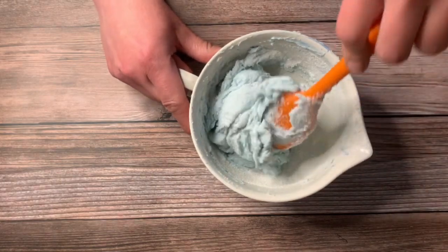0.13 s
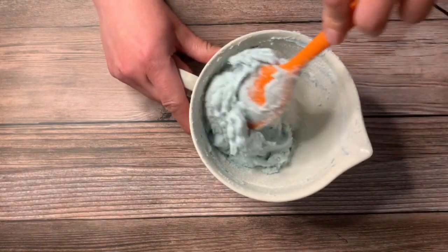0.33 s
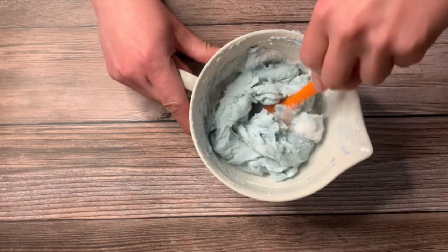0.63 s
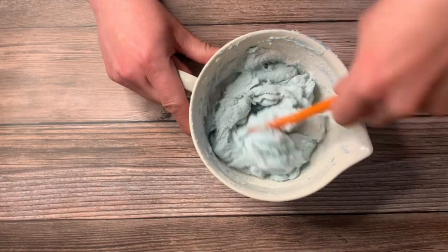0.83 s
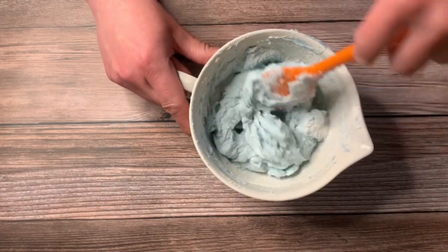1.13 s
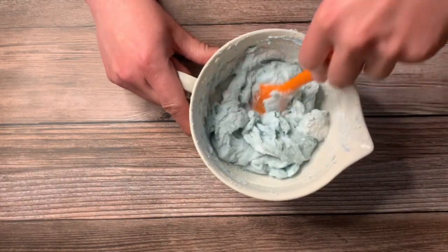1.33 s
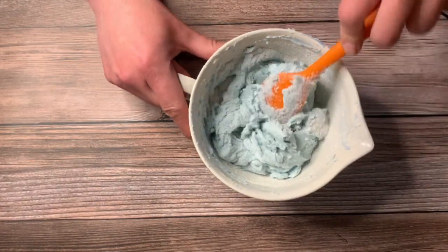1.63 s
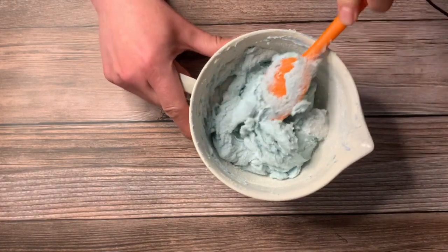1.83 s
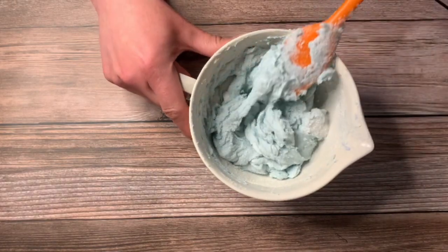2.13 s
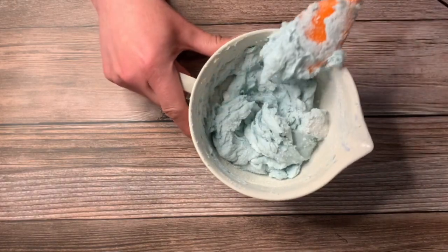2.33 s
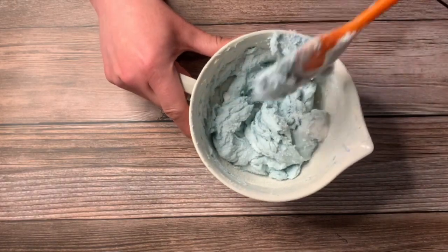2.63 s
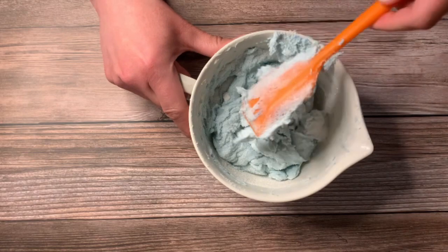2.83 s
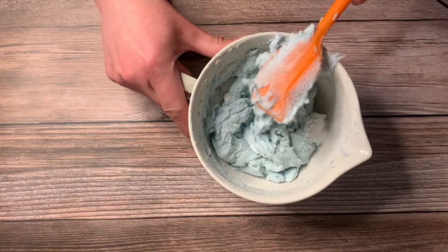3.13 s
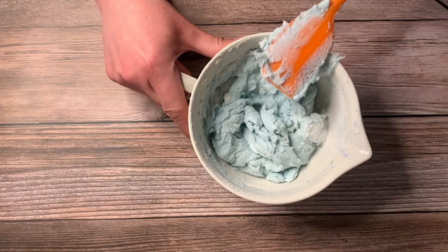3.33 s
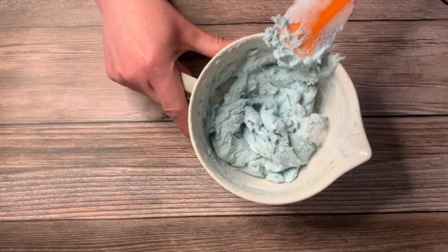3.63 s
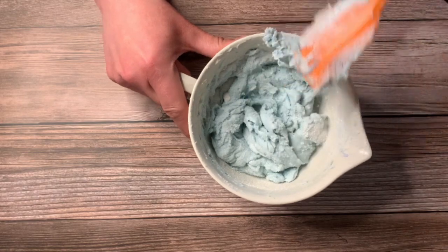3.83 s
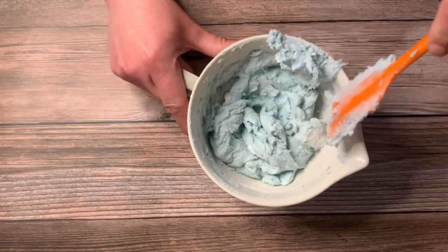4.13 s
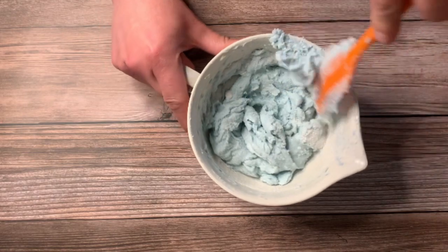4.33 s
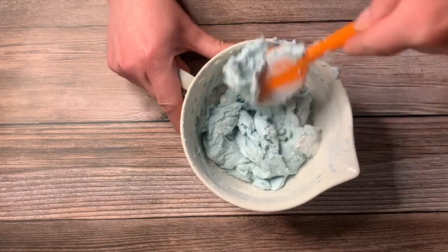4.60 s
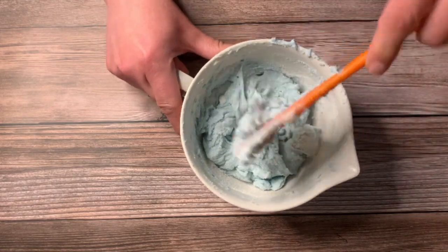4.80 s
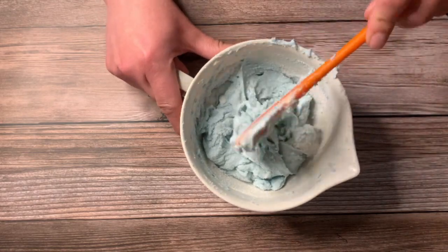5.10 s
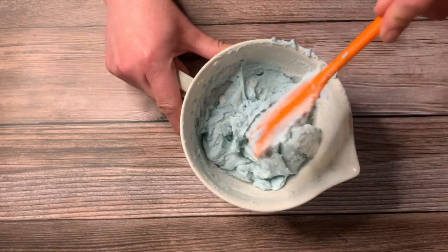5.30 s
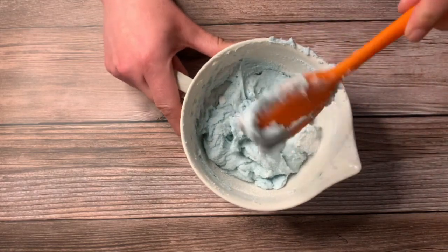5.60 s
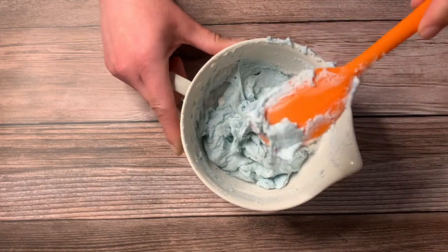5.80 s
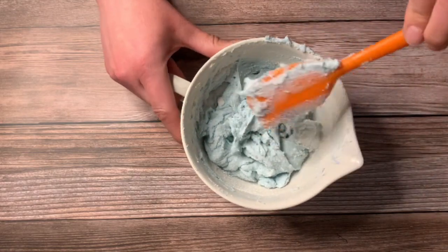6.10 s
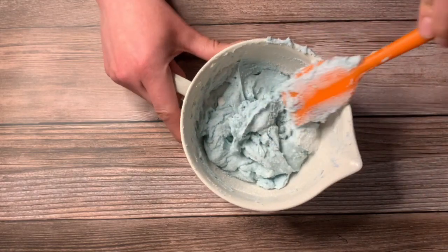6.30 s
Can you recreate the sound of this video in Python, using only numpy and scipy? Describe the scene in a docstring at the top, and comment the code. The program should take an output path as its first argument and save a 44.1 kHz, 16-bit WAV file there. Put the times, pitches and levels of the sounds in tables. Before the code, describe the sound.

Quiet, intimate stirring on a wooden table. Thick grainy paste rasps, hisses and rubs against a ceramic bowl wall in short uneven strokes, crackling stickily as it parts. Low bumps come as the bowl rocks, and the blade taps the rim with short, dry ceramic knocks, three of them prominent. Late on, the bowl's foot creaks briefly. Low steady air and hum lie beneath; one close microphone, nearly centred, light room reflections.

```python
"""A soft spatula folds a thick sugar paste in a ceramic bowl on a wooden table, in a quiet, faintly humming room.
From the start, noisy strokes of grain contacts rasp, hiss and rub, while near sines creak under the bowl's foot
and short puffs of noise tick as the paste parts. Then narrow noise squelches, low swings rock the bowl on the
table, and the blade's knocks set bowl and table modes ringing; strokes, ticks and creaks go on between them.
Walls and room echo it all; one microphone feeds both channels, the right one half a millisecond late."""
import sys
import numpy as np
from scipy import signal
from scipy.fft import rfft, irfft
from scipy.io import wavfile

SR = 44100
rng = np.random.default_rng(int(sys.argv[2]) if len(sys.argv) > 2 else 0)


def transcribe(signal):
    """Save signal, clipped to [-1, 1], as a 16-bit WAV file at the path in sys.argv[1]."""
    frames = np.atleast_2d(signal).T
    limited = np.clip(frames, -1, 1)
    pcm = np.round(limited * 32767).astype(np.int16)
    wavfile.write(sys.argv[1], SR, pcm)


N = 284533   # length in samples


def from_db(db):
    """Decibels to gain."""
    return 10 ** (np.asarray(db) / 20)


def rms_one(x):
    """Scale to rms 1."""
    return x / np.sqrt(np.mean(x ** 2) + 1e-20)


def bandpass(x, order, low_hz, high_hz):
    """Butterworth filter that passes one band."""
    return signal.sosfilt(signal.butter(order, [low_hz, high_hz], "band", fs=SR, output="sos"), x)


def drift(rate_hz):
    """Slow random wander of rms 1: noise smoothed by two equal poles on every 40th sample."""
    pole = np.exp(-2 * np.pi * rate_hz * 40 / SR)
    white = rng.standard_normal(N // 40 + 2002)
    slow = signal.lfilter([1], [1, -2 * pole, pole ** 2], white)[2000:]   # the filter has settled
    return np.interp(np.arange(N) / 40, np.arange(len(slow)), rms_one(slow))


def resonance(x, hz, width_hz):
    """Two-pole peak with gain 1 on top."""
    r = np.exp(-np.pi * width_hz / SR)
    zeros = (1 - r * r) / 2 * np.array([1, 0, -1])
    return signal.lfilter(zeros, [1, -2 * r * np.cos(2 * np.pi * hz / SR), r * r], x)


def ring(force, hz, t60):
    """A decaying mode: a unit click sets a sine of height 1 ringing, down 60 dB after t60 seconds."""
    r = from_db(-60 / (t60 * SR))
    w = 2 * np.pi * hz / SR
    return signal.lfilter([0, np.sin(w)], [1, -2 * r * np.cos(w), r * r], force + 1e-18)


def coloured(x, spectrum):
    """Shape x by a spectrum drawn over log frequency; rms 1."""
    hz, level_db = np.transpose(spectrum)
    grid = np.maximum(np.arange(N // 2 + 1) * SR / N, 1)
    shape = from_db(np.interp(np.log(grid), np.log(hz), level_db, left=-60))
    return rms_one(irfft(rfft(x) * shape, N))


def grains(per_s, spread_db):
    """Random clicks of uneven size and either sign, as from many small contacts."""
    sizes = from_db(spread_db * np.minimum(rng.exponential(1, N), 5)) * rng.choice([-1, 1], N)
    return sizes * (rng.random(N) < per_s / SR)


# Colour of the room air. Each row: frequency in Hz, relative density in dB per Hz.
AIR_SPECTRUM = [(28, 16), (50, 14), (75, 10.5), (95, 9.5), (170, 7), (250, 2.5), (500, 3.5), (700, -2),
                (1500, -8.5), (1900, -13), (2800, -18.5), (5600, -23), (12300, -28), (14000, -45)]
# Hum lines. Each row: centre in Hz, wander in Hz rms, level in dB rms before it wavers.
HUM_LINES = [(59.8, 2.4, -55.5), (121, 3, -73), (544, 3, -77), (940, 3, -81), (1305.5, .5, -71)]
AIR_DB, RUMBLE_DB, RUMBLE_TOP_HZ = -59.5, -45, 17.3


def background():
    """Steady coloured noise as air, hum lines of appliances wavering in pitch and level, and a lumpy rumble."""
    air = from_db(AIR_DB) * coloured(rng.standard_normal(N), AIR_SPECTRUM)
    hum = np.zeros(N)
    for hz, wander_hz, level_db in HUM_LINES:
        phase = 2 * np.pi * np.cumsum(hz + wander_hz * drift(2.96)) / SR
        hum += from_db(level_db + 1.3 * drift(6)) * np.sqrt(2) * np.sin(phase)
    low = bandpass(rng.standard_normal(N + SR), 3, 3, RUMBLE_TOP_HZ)[SR:]   # the filter has settled
    rumble = from_db(RUMBLE_DB + 1.67 * drift(1.7)) * rms_one(low)
    return air + hum + rumble


# Strokes of the blade. Each row: start of full strength in seconds, swell, hold and fade in seconds, base levels
# in dB of the rasp through the bowl wall, the bright hiss of the grains, the dull rub of the paste
# and the sticky crackle, then pitch of the squish in Hz.
BLADE_STROKES = [(0.0, .02, 0.069, 0.67, -68.5, -79, -62, -98, 1740),
                 (0.458, 0.14, 0.28, 0.15, -63, -68.5, -66.5, -87, 1670),
                 (0.795, .06, 0.059, 0.12, -63, -68, -69, -92, 1560),
                 (0.867, 0.019, .02, 0.012, -62, -66, -62, -90, 1700),
                 (1.28, .15, 0.073, 0.052, -66, -70.5, -81, -84, 2050),
                 (1.394, 0.095, 0.04, .04, -63.5, -63.5, -58.5, -82, 1610),
                 (1.498, 0.031, 0.037, .03, -66, -66.5, -63.5, -83, 2120),
                 (1.559, 0.013, 0.0077, .03, -57.5, -76, -54.5, -77, 2240),
                 (2.165, .1, .17, .1, -71, -82, -77, -77, 1750),
                 (2.422, 0.069, 0.083, .09, -68, -73, -62.5, -71, 1650),
                 (3.023, 0.011, .005, 0.014, -65, -69, -69, -76, 1637),
                 (3.183, 0.13, 0.12, 0.055, -66, -72, -66, -74, 1610),
                 (3.332, 0.0075, 0.0039, 0.037, -54.5, -81, -57, -80, 1470),
                 (3.403, .04, 0.21, .06, -73.5, -81, -67, -79, 1610),
                 (3.696, 0.062, .01, 0.078, -68, -74, -70, -74, 1720),
                 (4.501, 0.18, 0.058, 0.084, -65, -66, -74, -72.5, 2260),
                 (4.62, 0.069, .03, 0.065, -64.5, -74, -57.5, -80, 1540),
                 (5.221, 0.014, 0.0029, .04, -67.5, -71, -88, -73, 1750),
                 (6.389, 0.028, .04, 0.045, -62.5, -72, -57, -74.5, 1510)]
# Colours of rub, rasp and hiss. Each row: frequency in Hz, relative density in dB per Hz.
RUB_SPECTRUM = [(150, -37), (300, 6.5), (520, 17.5), (850, -2), (1100, -7), (1600, -63)]
RASP_SPECTRUM = [(600, -2), (950, 4), (1300, -2.5), (1700, -8), (2200, -4.5), (2800, -16), (3800, -17),
                 (5500, -25)]
HISS_SPECTRUM = [(2500, -37.5), (4000, -23), (5600, -5.5), (7200, -3.5), (9000, -8), (11000, -23.5),
                 (13500, -15.5), (15900, -39)]
# Resonances of the crackle. Each row: centre in Hz, width in Hz, relative level in dB.
CRACKLE_BANDS = [(5800, 1900, -10), (7400, 800, -0.5), (9200, 1600, -5)]
STROKE_RANGE_DB = 15   # the level change over one swell or fade time
# squish over rasp where the rasp's base level is FIRM_RASP_DB; it gains on the rasp in firmer strokes
SQUISH_DB, SQUISH_FOLLOWS, FIRM_RASP_DB = 3.5, 0.7, -62.5


def strokes():
    """Dense grain contacts: the rub wavers on its own, rasp and hiss waver with the pressure, the hiss is
    clumpy, sticky paste crackles."""
    t = np.arange(0, N + 32, 32) / SR   # envelopes on every 32nd sample
    full, swell, hold, fade, *levels_db, pitch_hz = np.transpose(BLADE_STROKES)[:, :, None]
    before = np.maximum(full - t, 0) / swell
    after = np.maximum(t - full - hold, 0) / fade
    shape_db = -STROKE_RANGE_DB * (before + after)
    power = [from_db(np.maximum(shape_db + db, -150)) ** 2 for db in levels_db]
    # the strongest rasp sets the pitch where strokes overlap
    mean_hz = (power[0] * pitch_hz).sum(axis=0) / power[0].sum(axis=0)
    curves = [np.sqrt(p.sum(axis=0)) for p in power] + [mean_hz]
    rasp_gain, hiss_gain, rub_gain, crackle_gain, squish_hz = (
        np.interp(np.arange(N) / SR, t, curve) for curve in curves)

    pressure = drift(29)   # shared by rasp and hiss
    rub = from_db(0.57 * drift(42)) * coloured(grains(per_s=3200, spread_db=3.0), RUB_SPECTRUM)
    grit = coloured(grains(per_s=2500, spread_db=2.0), RASP_SPECTRUM)

    # the pocket between blade and wall rings at a moving pitch: fixed peaks fade in and out along it
    squish = np.zeros(N)
    for hz in np.geomspace(1300, 2700, 11):
        nearness = np.exp(-(np.log(squish_hz / hz) / 0.13) ** 2)
        squish += nearness * resonance(grit, hz, 167)
    firmness = (rasp_gain / from_db(FIRM_RASP_DB)) ** SQUISH_FOLLOWS
    rasp = from_db(0.72 * pressure) * (grit + from_db(SQUISH_DB) * firmness * squish)

    clumps = from_db(1.1 * pressure + 0.6 * drift(70))
    hiss = clumps * coloured(grains(per_s=12000, spread_db=1.0), HISS_SPECTRUM)

    pops = grains(per_s=630, spread_db=4.0)
    crackle = np.zeros(N)
    for hz, width_hz, db in CRACKLE_BANDS:
        some = pops * (rng.integers(0, 3, N) == 0)   # a random third of the pops rings here
        crackle += from_db(db) * resonance(some, hz, width_hz)
    return rub_gain * rub + rasp_gain * rasp + hiss_gain * hiss + crackle_gain * rms_one(crackle)


# The bowl's foot creaks on the wood. Each row: loudest moment in seconds, pitch in Hz, level there in dB rms
# before the flutter.
FOOT_CREAKS = [(0.05, 418, -63), (0.15, 422, -59.5), (0.28, 422, -64), (5.205, 330.3, -55.5),
               (5.209, 397, -51.5), (5.25, 416, -51.5)]
CREAK_RISE_S, CREAK_T60_S, CREAK_ROUGH = 0.016, 0.19, 0.31   # rise over 30 dB, fall over 60 dB, flutter depth


def creak():
    """Fast stick and slip: near sines that swell, flutter and die."""
    t, out = np.arange(N) / SR, np.zeros(N)
    for s, hz, level_db in FOOT_CREAKS:
        rise_db = 30 * np.maximum(s - t, 0) / CREAK_RISE_S
        fall_db = 60 * np.maximum(t - s, 0) / CREAK_T60_S
        out += from_db(level_db - rise_db - fall_db) * np.sqrt(2) * np.sin(2 * np.pi * hz * t)
    return out * (1 + CREAK_ROUGH * drift(64))


# Ticks of parting paste. Each row: start in seconds, peak of the bright part in dB, its centre in Hz,
# gain of the dull part in dB.
PASTE_TICKS = [(0.063, -52.5, 7590, -3), (0.7687, -56, 6360, -12), (0.827, -49, 5930, -10),
               (1.524, -58, 5530, 12.5), (1.5427, -46, 5970, 8), (1.5618, -58.5, 7640, 18.5),
               (1.6536, -59, 5930, -4), (1.7556, -48.5, 5860, -15), (2.148, -54.5, 7400, -4),
               (2.204, -51.5, 7300, -3), (2.2413, -62, 7470, 8), (2.2823, -59, 7430, -1),
               (2.3042, -58, 7400, -3), (2.3994, -52, 7700, -2), (2.421, -55, 8500, -6),
               (2.489, -47, 7200, 4), (2.5106, -53, 8000, 2), (2.556, -55, 8200, -9),
               (2.602, -46, 8500, -9), (2.619, -52, 9000, -10), (2.639, -55.5, 7700, -2),
               (2.961, -60, 3400, -7), (3.0222, -52.5, 7200, -2), (3.156, -55, 8300, -2),
               (3.17, -51, 8400, -1), (3.2023, -43, 7400, -3), (3.2715, -57, 7550, -6),
               (3.296, -47, 7700, -0.5), (3.3323, -39, 6260, -4), (3.35, -53.5, 8570, 9),
               (3.4386, -53, 7760, -8), (3.5503, -61.5, 7500, 8), (3.705, -61, 7430, 8),
               (3.7656, -59, 8000, 1), (3.7985, -42, 9000, -5), (4.44, -48.5, 7160, -25),
               (4.562, -48, 6060, -2), (4.688, -59, 7420, 1), (5.026, -52, 6500, -8),
               (5.1506, -56, 7410, -14), (5.1615, -54, 8850, -22), (5.222, -58, 6030, -2),
               (6.3133, -44.5, 5800, 13.5), (6.414, -53, 6166, 1)]


def ticks():
    """Each tick is a few milliseconds of noise that swells and dies around its centre, with a duller part below."""
    out, t = np.zeros(N + 1024), np.arange(1024) / SR
    noise = rng.standard_normal((len(PASTE_TICKS), len(t)))
    swell = 1 - np.exp(-t / 0.00031)
    decay = np.exp(-t / 0.0012) + 0.12 * np.exp(-t / 0.012)
    for (s, peak_db, hz, low_db), puff in zip(PASTE_TICKS, noise * swell * decay):
        bright = resonance(puff, hz, 1860) + 0.19 * resonance(puff, 18700, 4500)
        dull = from_db(low_db) * resonance(puff, 1300, 1520)
        at = round(s * SR)
        out[at:at + len(t)] += from_db(peak_db) * (bright + dull) / np.abs(bright).max()
    return out[:N]


# Pockets of air squeezed out of the paste. Each row: start in seconds, length in seconds, centre in Hz,
# level in dB rms before the swell.
AIR_POCKETS = [(0.862, 0.032, 1704, -55.5), (0.869, .016, 540, -55.5), (3.268, 0.013, 1020, -52)]
SQUELCH_WIDTH_HZ = 190   # of each of two peaks in a row


def squelches():
    """Short puffs of noise in one narrow resonance."""
    out, noise = np.zeros(N), rng.standard_normal((len(AIR_POCKETS), SR // 10))
    for (s, length_s, hz, level_db), puff in zip(AIR_POCKETS, noise):
        once = resonance(puff, hz, SQUELCH_WIDTH_HZ)
        tone = rms_one(resonance(once, hz, SQUELCH_WIDTH_HZ))
        progress = np.minimum(np.arange(len(puff)) / SR / length_s, 1)
        swell = np.sin(np.pi * progress) ** 0.5
        out[round(s * SR):][:len(puff)] += from_db(level_db) * swell * tone
    return out


# The holding hand rocks the bowl on the table. Each row: start in seconds, relative level in dB, pitch in Hz.
BOWL_BUMPS = [(0.93, -44, 91), (1.689, -31, 116), (2.537, -52, 109), (3.121, -42.5, 104), (4.37, -40, 118),
              (4.74, -36.5, 107)]


def bumps():
    """Low, slow swings that swell for a cycle or two and die."""
    out, t = np.zeros(N), np.arange(SR // 4) / SR
    swell = t / 0.021 * np.exp(1 - t / 0.0085)
    for s, level_db, hz in BOWL_BUMPS:
        at = round(s * SR)
        out[at:at + len(t)] += from_db(level_db) * swell * np.sin(2 * np.pi * hz * t)
    return out


# Knocks of the blade. Each row: start in seconds, strength in dB, contact time scale in ms,
# relative drive of the rim modes in dB, relative thump of the table in dB.
BLADE_KNOCKS = [(1.679, -28, 0.8, 5, 4), (1.746, -35, 0.53, 4, -14), (1.7557, -14, 0.22, 5.5, -2.5),
                (2.685, -13, 0.38, -2, 1.5), (3.022, -41.5, 0.61, -7, 2), (3.085, -24, 0.71, 4, 4.5),
                (3.332, -36, 0.2, -1, -5), (3.349, -46.5, 0.2, 4, -8), (4.363, -38, 1, 7, 0),
                (4.71, -27.5, 0.63, 4, 3), (5.207, -47, 1, -11, 6), (6.316, -13.5, 0.22, 7, 0)]
# The bowl's foot meets the table just after the blade lands. Each row: delay in ms, level against the blow in dB.
FOOT_REBOUNDS = [(2.47, -1.5), (6.2, -5)]
# Modes of bowl and table top. Each row: frequency in Hz, relative level in dB, t60 in seconds.
BOWL_MODES = [(253, -17.5, 0.26), (324.3, -5, 0.052), (385.6, -30.5, 0.37), (439, -6, 0.068),
              (470, -33, 0.057), (600, -24, 0.076), (540.5, 0, 0.062), (612.7, -4.5, 0.14),
              (689, -2.5, 0.14), (793, -16, 0.057), (817.6, 3, 0.04), (935, -10, 0.068), (928, -4.5, 0.024),
              (1004, 4.5, 0.029), (1170, 2.5, 0.019), (1370, 0, 0.14), (1533, -9.5, 0.096),
              (1588, -6.5, 0.027), (1843, -2, 0.038), (2115, -2, 0.013), (2270, -6, 0.018),
              (2630, -4.5, 0.04), (3370, -3, 0.0099), (3446, -0.5, 0.011), (451.4, 9.5, 0.019),
              (849, 13.5, 0.0092)]
# Modes of table legs and top. Each row: frequency in Hz, relative level in dB, t60 in seconds.
TABLE_MODES = [(36.6, -16.5, 0.25), (103.4, -8.5, 0.37), (124.5, -23.5, 0.25), (152, -17.5, 0.37),
               (195, -8.5, 0.08)]
RIM_HZ = 600, 900   # the band of modes that only a blow near the rim excites fully
REBOUND_SOFTER = 1.17   # contact time of a rebound over that of the blow
WALL_DRIVE_DB, RIM_DRIVE_DB, TABLE_DRIVE_DB = -9.5, -14, -11.5


def knocks():
    """A push and its rebounds drive all modes; a long, soft contact leaves the high ones dull."""
    wall, rim, weight = np.zeros((3, N))
    ms = np.arange(0, 14, 1000 / SR)
    late_ms, rebound_db = np.transpose(FOOT_REBOUNDS)[:, :, None]
    late = np.maximum(ms - late_ms, 0)
    for s, strength_db, contact_ms, rim_db, thump_db in BLADE_KNOCKS:
        push = ms ** 2 * np.exp(-3 * ms / contact_ms)
        # the cube keeps the longer rebound's area that of the push
        rebound = late ** 2 * np.exp(-3 * late / (REBOUND_SOFTER * contact_ms)) / REBOUND_SOFTER ** 3
        total = push + (from_db(rebound_db) * rebound).sum(axis=0)
        force = from_db(strength_db) * total / push.sum()
        span = slice(round(s * SR), round(s * SR) + len(ms))
        wall[span] += from_db(WALL_DRIVE_DB) * force
        rim[span] += from_db(rim_db + RIM_DRIVE_DB) * force
        weight[span] -= from_db(thump_db + TABLE_DRIVE_DB) * force
    out = sum(from_db(db) * ring(weight, hz, t60) for hz, db, t60 in TABLE_MODES)
    for k, (hz, db, t60) in enumerate(BOWL_MODES):
        drive = rim if RIM_HZ[0] < hz < RIM_HZ[1] else wall
        out -= (-1) ** k * from_db(db) * ring(drive, hz, t60)   # rows start in alternating directions
    return out


# Single wall echoes. Each row: delay in seconds, level in dB.
WALL_ECHOES = [(.024, -20), (0.041, -12.5), (.053, -22.5)]
WALL_BAND_HZ = 423, 1000   # what a wall sends back


def walls(x):
    """A few late, dull copies stand out of the echoes."""
    dull, out = bandpass(x, 2, *WALL_BAND_HZ), np.zeros(N)
    for delay_s, level_db in WALL_ECHOES:
        lag = round(delay_s * SR)
        out[lag:] += from_db(level_db) * dull[:-lag]
    return out


# Decay of the room in bands a little over an octave wide. Each row: band centre in Hz, t60 in seconds.
ROOM_DECAY = [(120, 0.15), (300, 0.43), (700, 0.33), (1500, 0.36), (3000, 0.27), (6000, 0.29), (12000, 0.2)]
ROOM_DB, ECHO_BUILD_S = -9.5, 0.013


def room(x):
    """Diffuse echoes: noise that builds up until the first wall answers and dies band by band."""
    t = np.arange(SR // 2) / SR
    echoes = np.zeros(len(t))
    for hz, t60 in ROOM_DECAY:
        noise = bandpass(rng.standard_normal(len(t)), 2, hz / 1.5, hz * 1.5)
        echoes += noise * from_db(-60 * t / t60)
    echoes *= np.clip(t / ECHO_BUILD_S, 0, 1) ** 2 / np.sqrt(0.02 * SR)
    return signal.fftconvolve(x, echoes)[:N]


RIGHT_LAG = 23   # samples


def scene():
    """All sources at one microphone, copied to two channels with a lag."""
    near = strokes() + creak() + ticks() + squelches() + bumps() + knocks()
    mono = background() + near + walls(near) + from_db(ROOM_DB) * room(near)
    right = np.concatenate([np.full(RIGHT_LAG, mono[0]), mono[:-RIGHT_LAG]])
    return np.stack([mono, right])


CUTOFF_HZ = 15900


def record(dry):
    """A steep low-pass cuts the top."""
    return signal.sosfilt(signal.ellip(10, 0.5, 60, CUTOFF_HZ, fs=SR, output="sos"), dry)


dry = scene()
out = record(dry)
transcribe(out)
```